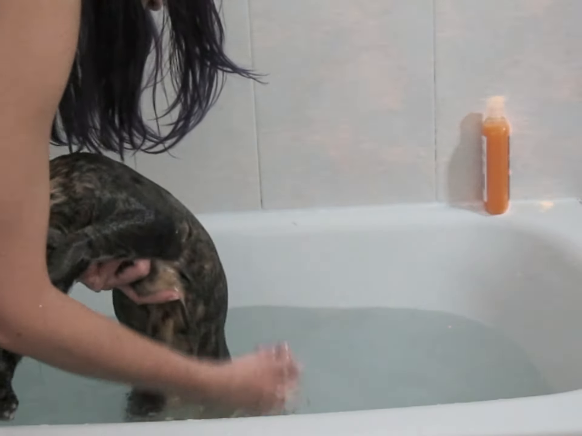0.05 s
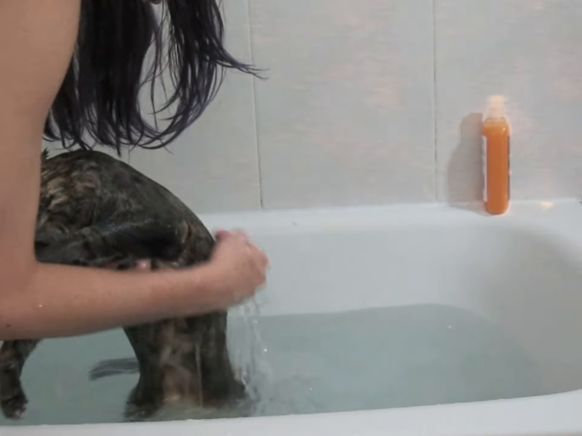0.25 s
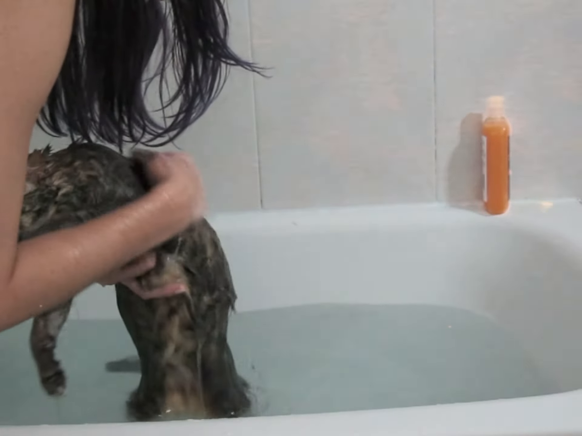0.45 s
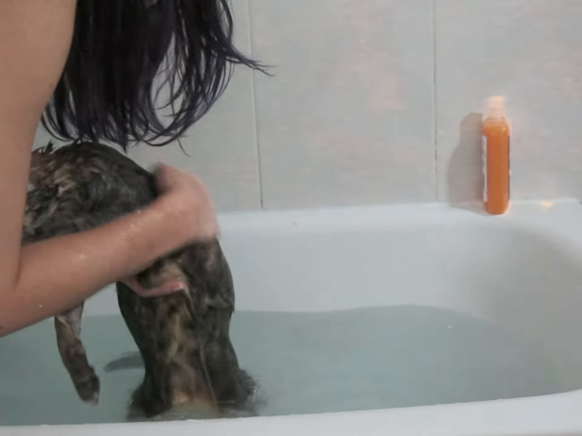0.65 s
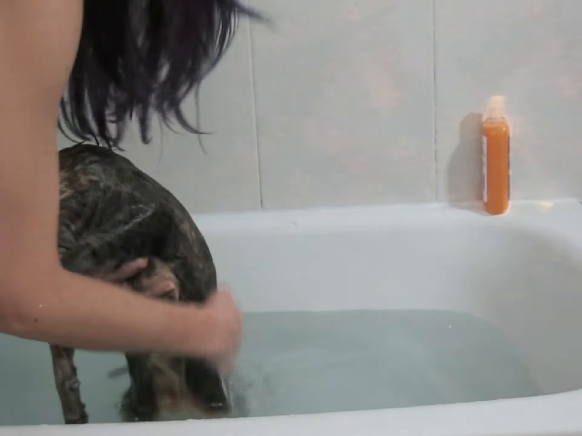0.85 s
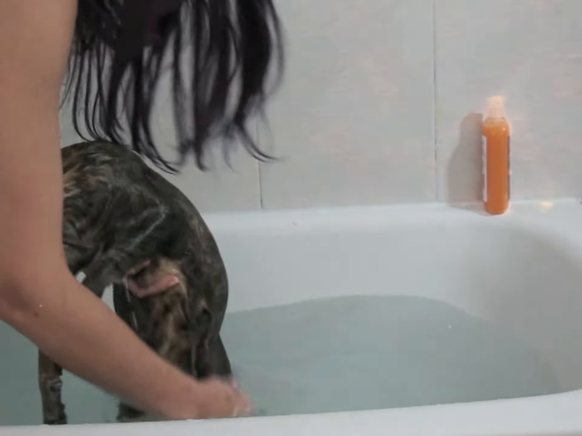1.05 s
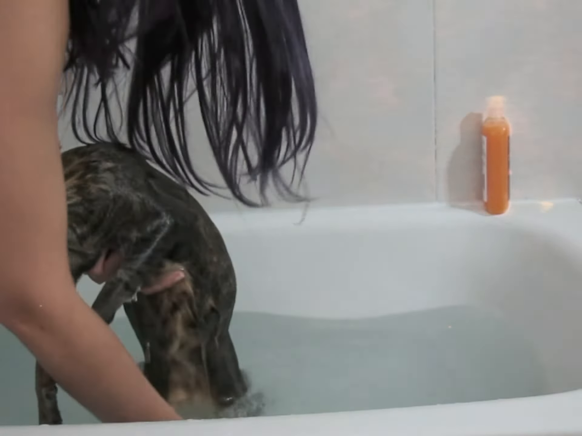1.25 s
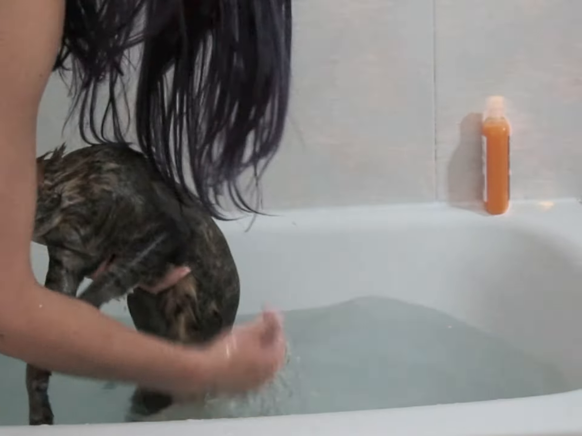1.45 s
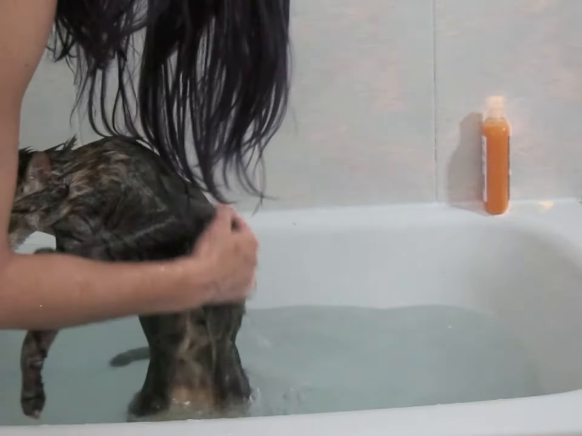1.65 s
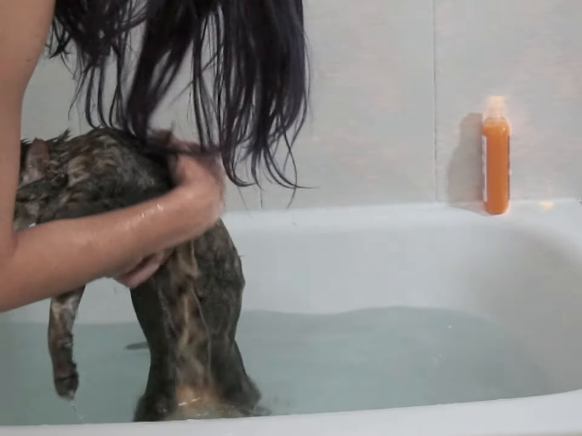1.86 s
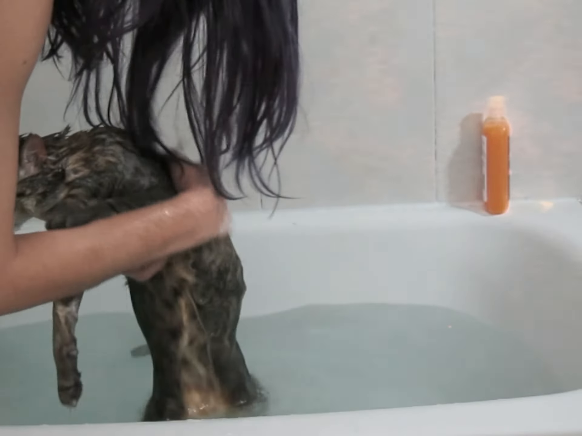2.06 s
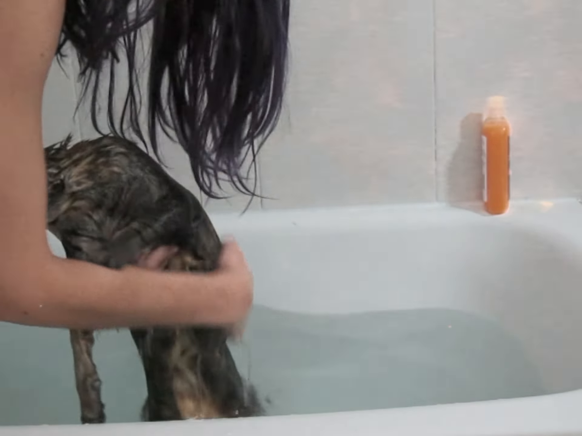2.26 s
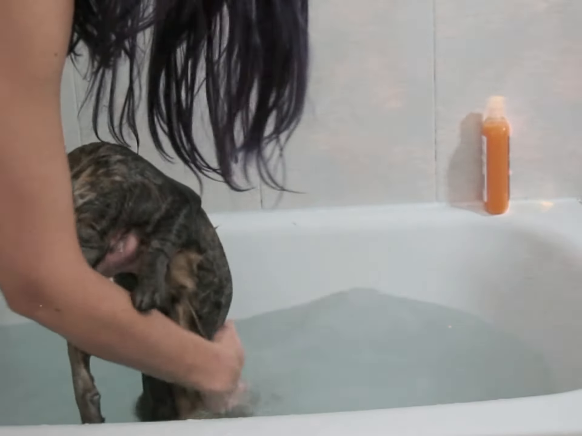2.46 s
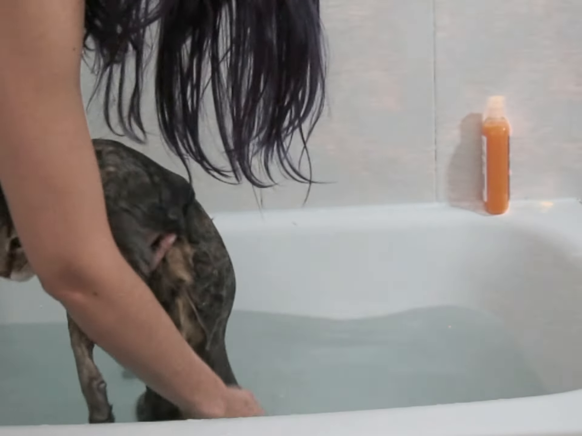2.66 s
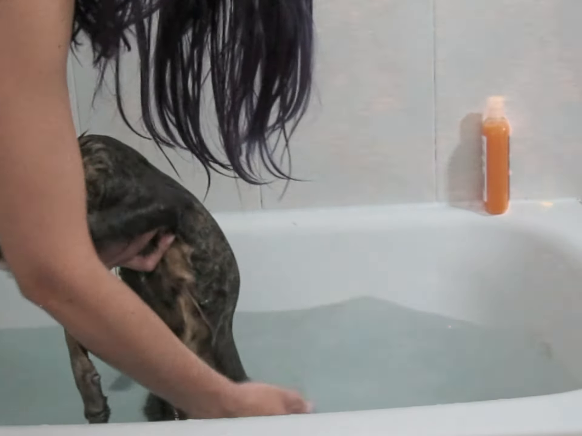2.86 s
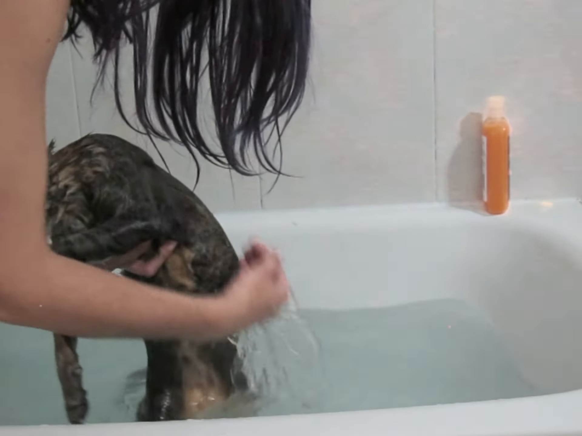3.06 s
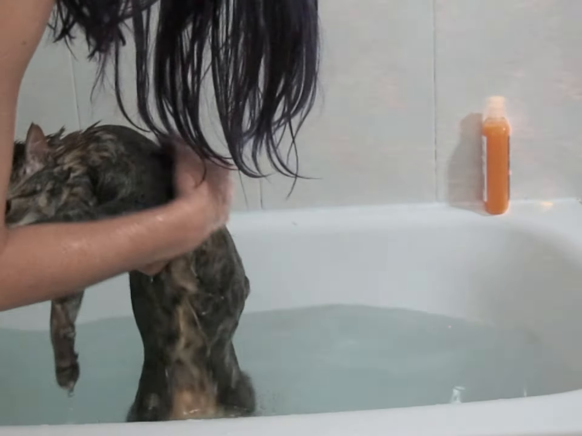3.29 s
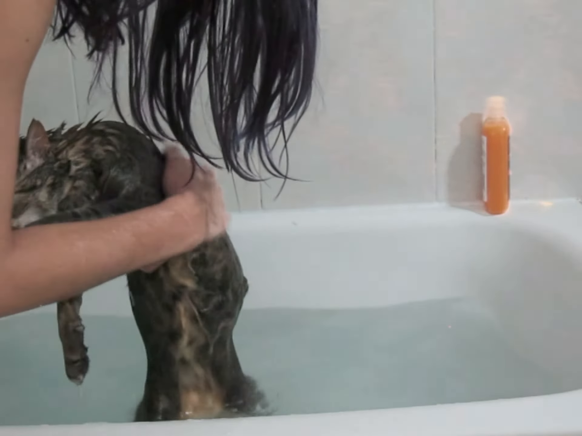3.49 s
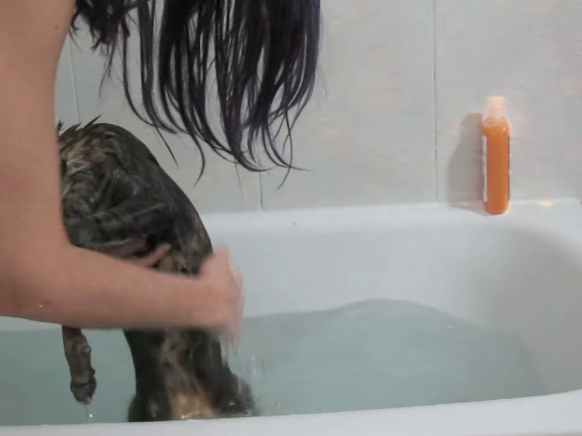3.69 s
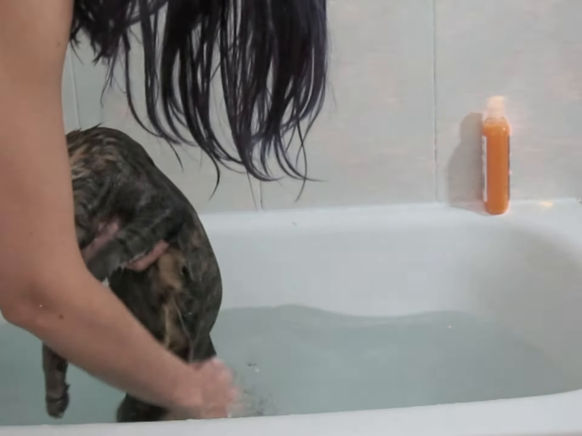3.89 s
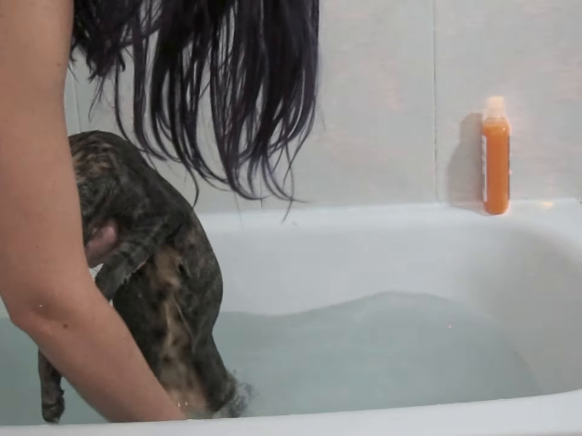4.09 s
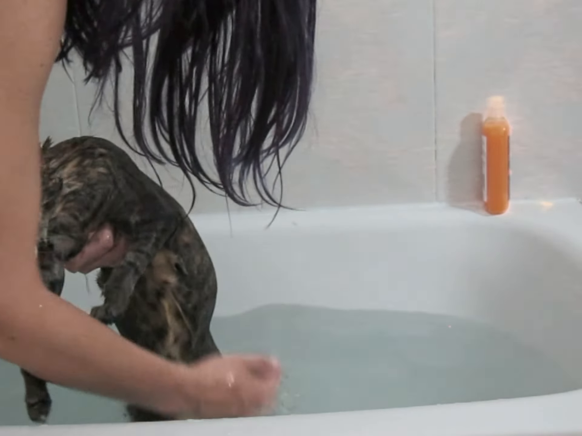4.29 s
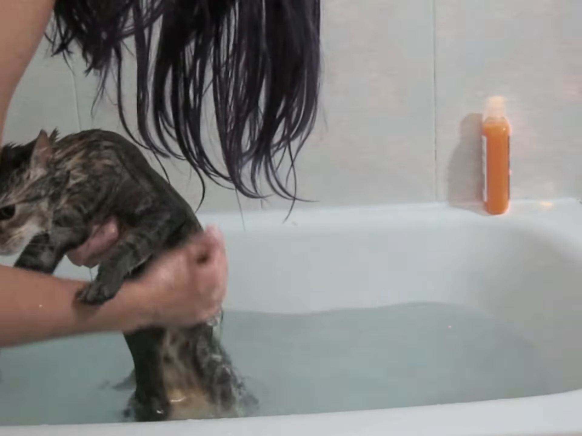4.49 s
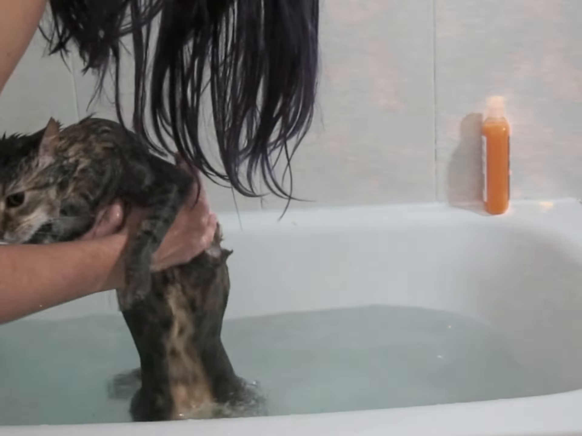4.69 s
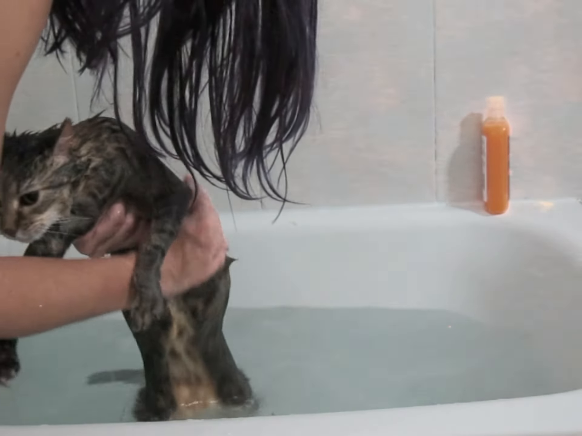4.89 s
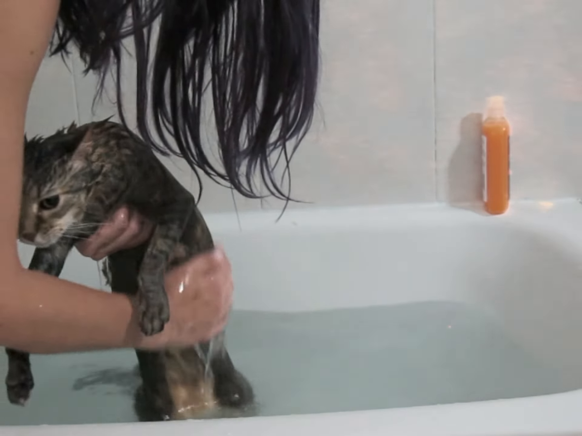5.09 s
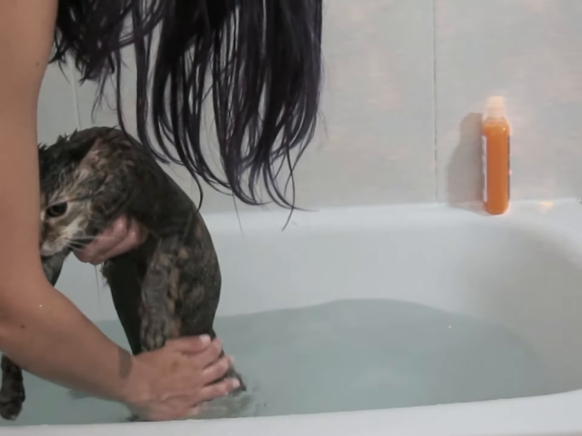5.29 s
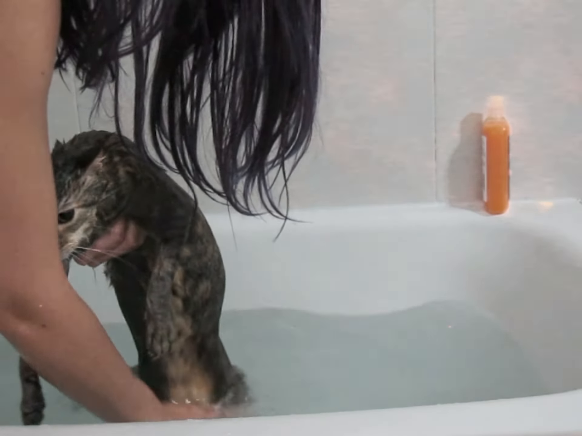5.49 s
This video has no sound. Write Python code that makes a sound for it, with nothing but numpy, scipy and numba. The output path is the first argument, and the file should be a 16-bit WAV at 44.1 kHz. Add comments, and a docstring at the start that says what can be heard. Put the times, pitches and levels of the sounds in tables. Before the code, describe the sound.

Close water sounds in a small, reflective bathroom: splashing and bubbling right away, a brief lull, then a run of hand scoops, each a plop and gurgle followed by water slapping and trickling back into the tub. The strongest slaps come near the first and second seconds; later splashes are softer, with drips between. The sound is centred and bright, with light steady hiss and a faint rumble; the cat makes no sound.

```python
"""Small tiled bathroom: a hand scoops bath water and pours it over a wet cat standing in the tub.
Trapped air rings as short rising bubbles, large and low in the slosh, tiny and dense in the spray;
water slapping water adds bright noise cracks, and the hard walls draw each sound out.
A single microphone adds its hiss and colour, over a low rumble; both channels are the same."""
import sys
import numpy as np
from scipy import signal
from scipy.fft import rfft, irfft, next_fast_len
from scipy.io import wavfile
from numba import njit

SR = 44100
rng = np.random.default_rng(int(sys.argv[2]) if len(sys.argv) > 2 else 0)


def log_audio(samples):
    """Write samples as a 16-bit WAV file to the path given in sys.argv[1]."""
    # one column per channel
    frames = np.atleast_2d(samples).T
    # limit to full scale, then quantise
    limited = np.clip(frames, -1, 1)
    pcm = np.round(limited * 32767).astype(np.int16)
    wavfile.write(sys.argv[1], SR, pcm)


N = 244314


def from_db(db):
    """Amplitude of a level in dB."""
    return 10 ** (np.asarray(db) / 20)


def rms_one(x):
    """Scale to unit RMS."""
    return x / np.sqrt(np.mean(x ** 2) + 1e-20)


def at_hz(points, hz):
    """Read a (frequency, value) curve, linear over log frequency."""
    corner_hz, value = np.array(points).T
    return np.interp(np.log(hz + 1), np.log(corner_hz), value)


def background():
    """Steady hiss of the input stage (half-octave noise bands) and building rumble (resonant noise)."""
    # hiss spectrum: (frequency [Hz], relative density [dB per Hz])
    hiss_curve = [(59, -33), (100, -8.5), (481, -11), (1030, -11), (2220, -21), (3290, -15), (6250, -28),
                  (7690, -13.5), (11600, -25.5), (12900, -23), (14000, -53)]
    # rumble resonances: (frequency [Hz], pole width [Hz], RMS level [dB])
    rumble_modes = [(21.7, 13.3, -53), (62.4, 22.2, -59.5), (153.9, 17, -74)]
    hiss_db = -59.5

    white = rng.standard_normal((2, N))
    edges_hz = 90 * 2 ** np.arange(0, 7.6, .5)
    hiss = 0
    for k, (low_hz, high_hz) in enumerate(zip(edges_hz, edges_hz[1:])):
        sos = signal.butter(2, [low_hz, high_hz], "band", fs=SR, output="sos")
        band = signal.sosfilt(sos, white[k % 2])  # neighbours use independent noise
        hiss = hiss + from_db(at_hz(hiss_curve, np.sqrt(low_hz * high_hz))) * band
    out = from_db(hiss_db) * rms_one(hiss)

    for hz, width_hz, level_db in rumble_modes:
        r = np.exp(-np.pi * width_hz / SR)
        sos = [[0.98, 0.0025, -1, 1, -2 * r * np.cos(2 * np.pi * hz / SR), r * r]] * 2
        settled = signal.sosfilt(sos, rng.standard_normal(N + SR))[SR:]
        out += from_db(level_db) * rms_one(settled)
    return out


def bathroom(spots):
    """Direct sound, one strong tile echo, standing waves, and looping paths that differ by spot."""
    # reverberation of the tiled room: (frequency [Hz], T60 [s])
    tiles_t60 = [(100, 1), (500, 0.19), (1500, 0.32), (4000, 0.25), (8000, 0.19), (14000, 0.27)]
    # gain of the scattered sound: (frequency [Hz], gain [dB])
    scatter_gain = [(300, 5), (1000, 8), (3000, 4.5), (8000, 9.5), (14000, 9)]
    # standing waves over the tub: (frequency [Hz], T60 [s], relative level [dB])
    air_modes = [(440.7, 0.63, 2), (520, 1, -8), (579, 0.78, -4), (589, 0.49, -9), (625, 0.55, -3.5),
                 (691, 0.53, -5.5), (910, .5, -3.5), (970, 0.17, -6), (1058, 0.31, -1.5),
                 (1183, 0.38, -1.5), (1344, 0.37, -0.5)]
    first_echo_s, echo_db, modes_db = 0.01, -5, 14

    size = next_fast_len(N + SR // 2)
    hz = np.arange(size // 2 + 1) * SR / size
    travel = np.log(1000) / at_hz(tiles_t60, hz) + 2j * np.pi * hz  # loss and phase per second of path

    scatter = from_db(at_hz(scatter_gain, hz))
    for lag_s in (.001317, .002903, .004731):  # near-allpass diffusers
        step = np.exp(-2j * np.pi * hz * lag_s)
        scatter = scatter * (step - .6) / (1 - 0.61 * step)

    standing = 0
    for mode_hz, mode_t60_s, gain_db in air_modes:
        detuning = 2j * np.pi * (hz - mode_hz) * mode_t60_s / np.log(1000)
        standing = standing + from_db(gain_db) / (1 + detuning)
    echo_delay = np.exp(-2j * np.pi * hz * first_echo_s)
    early = 1 + echo_delay * (from_db(echo_db) + from_db(modes_db) * standing)

    out = 0
    for x, shortest_s in zip(spots, (.0127, .01343, .01411)):
        lags_s = shortest_s * 1.1317 ** np.arange(13)
        loops = 0
        for k, lag_s in enumerate(lags_s):
            weight = (-1) ** k * np.sqrt(lag_s / lags_s.sum())
            loops = loops + weight / (np.exp(lag_s * travel) - 1)  # endless decaying repeats
        out = out + rfft(x, size) * (early + scatter * loops)
    return irfft(out, size)[:N]


def microphone(x):
    """Presence peaks of the small capsule and its housing, and a falling top."""
    # broad response: (frequency [Hz], gain [dB])
    slope = [(20, -5), (9800, 0.5), (10600, 0), (13000, -3), (14300, -9)]
    # presence peaks: (frequency [Hz], width [Hz], gain [dB])
    peaks = [(3290, 860, 8), (5200, 620, 4), (7510, 920, 9), (9110, 850, 8)]

    size = next_fast_len(N + 4096)
    hz = np.arange(size // 2 + 1) * SR / size
    out = irfft(rfft(x, size) * from_db(at_hz(slope, hz)), size)[:N]
    for peak_hz, width_hz, gain_db in peaks:
        r = np.exp(-np.pi * width_hz / SR)
        b = [(1 - r * r) / 2, 0, (r * r - 1) / 2]
        a = [1, -2 * r * np.cos(2 * np.pi * peak_hz / SR), r * r]
        out = out + (from_db(gain_db) - 1) * signal.lfilter(b, a, out)
    return out


def slaps():
    """A sheet of water bursts on the surface: band-passed decaying noise, a crack of milliseconds."""
    # slaps of water on water: (time [s], level [dB], decay time [s], low edge [Hz], high edge [Hz])
    slap_events = [(0.801, -38, .004, 3000, 12800), (0.814, -24, 0.004, 2440, 12800),
                   (1.497, -35.5, 0.0082, 2980, 10000), (2.263, -27, 0.0062, 2620, 8900),
                   (2.27, -24.5, 0.005, 2600, 8100), (2.303, -29, 0.0036, 2500, 8800),
                   (2.102, -43.5, 0.0031, 8800, 13500), (2.478, -32.5, 0.0036, 9000, 14100),
                   (3.074, -35.5, 0.0062, 9600, 14000), (3.157, -35.5, 0.009, 3470, 11400),
                   (3.198, -31.5, 0.0066, 10100, 14150), (3.696, -40.5, 0.0069, 4940, 11100),
                   (3.733, -28.5, 0.01, 2720, 7800), (3.794, -28, 0.0057, 9000, 14000),
                   (4.399, -39.5, 0.021, 3420, 11300), (4.993, -35.5, 0.0056, 6100, 11000),
                   (5.361, -26, 0.0014, 6100, 10900)]

    out, t = np.zeros(N), np.arange(2000) / SR
    for start_s, level_db, decay_s, low_hz, high_hz in slap_events:
        burst = rng.standard_normal(len(t)) * np.exp(-t / max(decay_s, .0005))
        sos = signal.butter(2, [low_hz, high_hz], "band", fs=SR, output="sos")
        out[int(start_s * SR):][:len(t)] += from_db(level_db) * signal.sosfilt(sos, burst)
    return out


@njit
def ring_bubbles(out, start, height, hz, rise_octaves, cycles, sr):
    """Each bubble is a dying sine; its pitch climbs as it nears the surface."""
    for k in range(len(start)):
        length, phase = int(cycles[k] / hz[k] * sr), 0.
        for i in range(min(length, len(out) - start[k])):
            gone = i / length
            phase += 2 * np.pi * hz[k] * 2 ** (rise_octaves[k] * gone) / sr
            shape = 2 * min(1., 7 * gone) * (1 - gone) * np.exp(-gone)
            out[start[k] + i] += height[k] * shape * np.sin(phase)


def single_bubbles():
    """Clear plops and drips; each air pocket breaks up and leaves two weaker bubbles close by."""
    # single bubbles: (time [s], level [dB], starting pitch [Hz], rise [octaves],
    #                  length [cycles of the starting pitch])
    bubble_events = [(0.038, -37, 1820, .3, 8.6), (.061, -38.5, 3841, .15, 19), (.065, -44, 900, 0.37, 11),
                     (.114, -29, 900, 0.45, 12.7), (0.121, -36.5, 1244, 0.6, 25),
                     (.135, -36, 2510, 0.14, 19), (0.181, -39.5, 5330, .19, 23),
                     (.185, -33.5, 1550, .12, 13), (.201, -39, 9350, 0.3, 17), (.23, -35, 2920, 0.054, 20),
                     (.293, -39.5, 3940, 0.9, 30), (.326, -38.5, 3370, 0.19, 13),
                     (.343, -50, 634, .28, 9.1), (.33, -33, 6200, .18, 11), (.393, -39.5, 1960, 0.15, 18),
                     (0.484, -39.5, 7360, 0.31, 9.2), (.505, -45, 417, 0.086, 7.4),
                     (.513, -46, 2490, 0.13, 18), (.607, -49, 4920, 0.13, 21), (.645, -42, 1068, 0.037, 22),
                     (0.662, -49.5, 1147, 2.1, 29), (0.661, -52, 2580, 0.12, 20),
                     (0.695, -47.5, 5420, 0.19, 33), (.798, -39.5, 1340, 0.074, 21),
                     (.808, -31.5, 5880, 0.63, 22), (.835, -52.5, 414, .08, 5.3),
                     (.92, -36.5, 940, 0.62, 4.5), (.972, -36.5, 1030, 0.096, 13),
                     (.982, -26.5, 1160, .08, 3.8), (1.013, -42.5, 436, .092, 5.6),
                     (1.019, -37, 1380, 0.22, 8.4), (1.049, -42, 690, 0.058, 15),
                     (1.051, -41.5, 419, 0.078, 12), (1.072, -44.5, 2510, 0.54, 19),
                     (1.256, -54, 1570, 0.095, 52), (1.317, -40, 884, .08, 10.3),
                     (1.34, -40.5, 851, 0.32, 11.7), (1.341, -51.5, 2900, .31, 17),
                     (1.402, -44, 6060, 3.7, 9.7), (1.422, -48, 1600, 0.087, 34),
                     (1.457, -37.5, 1018, .08, 28), (1.477, -34, 595, 0.063, 23.6),
                     (1.518, -35, 1084, .08, 11), (1.53, -50, 559, .068, 31), (1.561, -37, 8900, 0.15, 19),
                     (1.613, -36, 1530, .055, 9.9), (1.74, -39, 1880, .08, 9.3),
                     (1.749, -47, 5500, .15, 18), (1.845, -38.5, 7730, 0.17, 12),
                     (1.854, -51, 5500, .12, 18), (1.88, -56, 3240, .17, 18),
                     (1.885, -43.5, 1766, 0.081, 24), (2.04, -48, 1690, 0.044, 12),
                     (2.052, -54, 2960, 0.18, 16), (2.099, -51, 9500, .26, 16),
                     (2.173, -51.5, 3370, 0.16, 16), (2.236, -46, 1090, 0.068, 24),
                     (2.26, -31.5, 7060, 0.16, 20), (2.29, -51.5, 421, 0.78, 22),
                     (2.357, -33.5, 1042, 0.091, 47), (2.381, -34, 1324, 0.11, 16),
                     (2.445, -43.5, 433, 0.069, 9.2), (2.471, -42.5, 9200, 0.14, 15),
                     (2.48, -40, 3190, 0.26, 17), (2.541, -42, 417, .059, 14), (2.565, -41, 403, .06, 10),
                     (2.63, -45.5, 6500, 0.82, 16), (2.679, -46.5, 1610, 0.18, 9.9),
                     (2.759, -49, 4280, 0.4, 59), (2.836, -49.5, 3380, .29, 22),
                     (2.873, -46.5, 1180, 0.97, 20), (2.887, -43, 5570, 0.23, 32),
                     (2.91, -35, 6900, .11, 15), (2.953, -35.5, 1240, .17, 8.5),
                     (2.968, -34.5, 6300, 0.15, 14), (2.972, -42, 2790, .15, 18),
                     (3.016, -44, 980, 0.043, 33), (3.062, -47.5, 2010, 0.064, 49),
                     (3.139, -37.5, 1390, 0.2, 9.8), (3.157, -39.5, 770, 0.14, 18.3),
                     (3.176, -32, 2590, 0.52, 26.5), (3.191, -48, 3120, .03, 40),
                     (3.198, -41, 736, .096, 22), (3.236, -34.5, 3020, .093, 25),
                     (3.237, -39.5, 1600, .08, 22), (3.529, -52, 7000, 1.3, 14), (3.709, -48, 1410, .1, 23),
                     (3.731, -35, 1373, 0.08, 11), (3.732, -32.5, 3070, 0.74, 22),
                     (3.739, -31, 4740, 0.45, 19), (3.832, -39, 970, 1.31, 22.8),
                     (3.92, -41.5, 580, .093, 7.7), (3.955, -46.5, 497, 0.072, 13.7),
                     (3.982, -46.5, 797, 0.078, 19), (4.027, -47.5, 5360, .18, 40),
                     (4.03, -55, 820, .08, 21), (4.086, -44, 7100, .13, 19), (4.137, -52.5, 2640, .15, 17),
                     (4.208, -41, 840, 0.24, 17), (4.209, -41.5, 2310, 0.23, 26.4),
                     (4.226, -45, 8750, .15, 16), (4.229, -40.5, 874, 0.99, 23.4),
                     (4.318, -45, 1040, 0.5, 14), (4.365, -43.5, 2780, 0.65, 8.3),
                     (4.392, -44.5, 1370, .08, 20), (4.423, -42.5, 2030, .38, 15),
                     (4.474, -45, 1100, .08, 6.8), (4.5, -43, 1460, .1, 14), (4.512, -42, 8500, 0.46, 13),
                     (4.537, -43.5, 3660, 0.65, 16), (4.671, -68, 520, 0.023, 100),
                     (4.721, -47.5, 953, 2.1, 48), (4.722, -47, 1044, 0.087, 19),
                     (4.762, -53.5, 2710, 0.16, 28), (4.842, -55, 1104, 0.071, 36),
                     (4.901, -45, 1360, 0.062, 28), (4.915, -66, 593, 0.031, 54),
                     (4.99, -40, 7030, .22, 26), (5.019, -48.5, 2890, 0.19, 48),
                     (5.028, -36, 1310, .062, 16.5), (5.063, -42, 9845, .15, 13),
                     (5.118, -44.5, 9300, .16, 32), (5.127, -35.5, 549, 0.06, 12.4),
                     (5.13, -41.5, 820, .25, 17.6), (5.183, -39, 900, 0.072, 16),
                     (5.214, -36, 7160, 0.14, 14), (5.272, -32, 1280, 1.12, 13.8),
                     (5.31, -36.5, 1260, 0.064, 11), (5.359, -49.5, 2010, 1.07, 54),
                     (5.363, -42.5, 610, 0.23, 7.3), (5.383, -49, 413, 0.049, 13),
                     (5.486, -57, 1640, 0.053, 21)]
    sibling_db, sibling_within_s, sibling_octaves = -3, .025, .17

    start_s, level_db, hz, rise_octaves, cycles = np.transpose(bubble_events)
    cycles = np.clip(cycles, 2, 90)
    out = np.zeros((3, N))
    ring_bubbles(out[0], (start_s * SR).astype(int), from_db(level_db), hz, rise_octaves, cycles, SR)
    for spot in out[1:]:
        later, detune = rng.random((len(start_s), 2)).T
        start = ((start_s + sibling_within_s * later) * SR).astype(int)
        height = from_db(level_db + sibling_db)
        sibling_hz = hz * 2 ** (sibling_octaves * (detune - .4))
        ring_bubbles(spot, start, height, sibling_hz, rise_octaves, 0.87 * cycles, SR)
    return out


def swarm(s, level_db, base_hz, octaves, per_s, cycles, spread_db, gain_db):
    """Chance bubbles of uneven size at three spots, scaled by the level curve at their birth."""
    when, pitch, size, climb, kept, spot = rng.random((14000, 6)).T
    when_s = when * N / SR
    born = kept < per_s * N / SR / len(kept)
    hz = np.interp(when_s, s, base_hz * np.ones(len(s))) * 2 ** (octaves * (pitch - .33))
    height = from_db(-spread_db * np.log(size + 0.038)) * born
    # level the swarm's overall power before the curve is applied
    height = height / np.sqrt(np.sum(height ** 2 * cycles / hz) / 3 * SR / N)
    height = height * from_db(np.interp(when_s, s, level_db) + gain_db)
    start = (when_s * SR).astype(int)
    out = np.zeros((3, N))
    for k in range(3):
        here = born * ((3 * spot).astype(int) == k)
        ring_bubbles(out[k], start, height, hz, 0.65 * climb, cycles * here, SR)
    return out


def surges(s, events, release_db_per_s):
    """Each surge in dB under its top, and time since the top: climb, sagging hold, release."""
    attack_depth_db, hold_sag_db_per_s = 21.5, 22.5
    start_s, attack_s, hold_s = np.transpose(events)[:3, :, None]
    attack_s = np.maximum(attack_s, .002)
    since_s = s - start_s - attack_s
    climb_db = attack_depth_db * np.minimum(since_s, 0) / attack_s
    after_s = np.maximum(since_s, 0)
    held_s = np.clip(since_s, 0, np.maximum(hold_s, 0))
    fall_db = hold_sag_db_per_s * held_s + release_db_per_s * (after_s - held_s)
    return climb_db - fall_db, after_s


def together(shape_db, top_db, calm_db, pitch_hz=0, calm_hz=0):
    """Overlapping surges and calm dripping add in power; pitch is their power-weighted mean."""
    power = from_db(np.maximum(shape_db + top_db[:, None], -200)) ** 2
    calm = from_db(calm_db) ** 2
    total = power.sum(axis=0) + calm
    mean_hz = (np.sum(power * pitch_hz, axis=0) + calm * calm_hz) / total
    return 10 * np.log10(total), mean_hz


def gurgle_and_slosh(s):
    """Large bubbles gurgle where the hand ploughs; lower ones slosh, stronger under deeper gulps."""
    # gulps of air pulled under: (start [s], attack [s], hold [s], level [dB], pitch [Hz])
    gulps = [(0, 0.041, 0.011, -23, 1382), (0.083, 0.067, 0.18, -36.5, 1026),
             (0.363, 0.061, 0.021, -43, 845), (0.454, 0.058, 0.012, -44, 482),
             (0.783, 0.023, 0.18, -29.5, 1332), (0.947, 0.067, 0.061, -30, 1010),
             (1.253, 0.037, 0.059, -41.5, 930), (1.346, 0.073, 0.037, -32, 1080),
             (1.457, 0.059, 0.036, -30, 750), (1.827, 0.035, 0.0068, -43.5, 1470),
             (2.223, 0.035, .01, -38.5, 1070), (2.356, .04, 0.013, -31, 1030),
             (2.459, .03, 0.04, -34.5, 958), (2.516, 0.044, .05, -33.5, 520),
             (2.8, 0.047, 0.0091, -40.5, 1185), (3.1, 0.078, 0.049, -38, 1042),
             (3.69, 0.043, .01, -36, 1445), (3.806, .03, 0.006, -25.5, 1123),
             (3.861, .06, 0.029, -39.5, 620), (4.004, .05, .12, -55, 840), (4.183, 0.032, 0.32, -42, 1088),
             (4.705, 0.035, 0.0091, -37.5, 1193), (4.798, 0.069, 0.078, -55, 1360),
             (4.994, 0.022, 0.058, -41, 1280), (5.109, 0.025, .05, -31.5, 680),
             (5.239, 0.051, 0.0082, -32.5, 1280), (5.334, 0.023, 0.0078, -32, 1070),
             (5.455, 0.053, .01, -50, 890)]
    # gurgle bubbles: (pitch spread [octaves], rate [1/s], length [cycles],
    #                  size spread [dB per e-fold], gain [dB])
    gurgle_swarm = (1.87, 150, 14, 2.5, -12)
    # slosh bubbles: (base pitch [Hz], then the same columns)
    slosh_swarm = (333.5, 1.46, 59, 6.5, 2, -27.5)
    release_db_per_s, calm_db, calm_hz = 150.5, -65, 900
    sag_octaves_per_s = 0.89  # pockets grow as the hand sinks
    slosh_db_per_octave, slosh_at_hz = -5.5, 804  # deeper gulps move more water

    *_, top_db, top_hz = np.transpose(gulps)
    shape_db, since_s = surges(s, gulps, release_db_per_s)
    pitch_hz = top_hz[:, None] * 2 ** (-sag_octaves_per_s * since_s)
    gurgle_db, gurgle_hz = together(shape_db, top_db, calm_db, pitch_hz, calm_hz)
    slosh_db = gurgle_db + slosh_db_per_octave * np.log2(gurgle_hz / slosh_at_hz)
    return swarm(s, gurgle_db, gurgle_hz, *gurgle_swarm) + swarm(s, slosh_db, *slosh_swarm)


def patter_and_spray(s):
    """Drops patter back as bubbles; fine spray fizzes as a dense swarm of tiny ones."""
    # splashes of the plunging, lifting and pouring hand: (start [s], attack [s], hold [s],
    #     patter level [dB], patter pitch [Hz], spray level [dB])
    splashes = [(0, 0.002, .01, -34, 2670, -31.5), (0.02, 0.11, 0.26, -31, 2784, -33),
                (0.528, 0.039, 0.015, -48, 3300, -44), (0.769, 0.038, 0.17, -33, 3085, -31.5),
                (1, 0.065, 0.035, -36, 2680, -34.5), (1.294, .1, 0.046, -43, 3510, -42.5),
                (1.44, .07, 0.039, -33, 2760, -31.5), (1.523, 0.055, 0.041, -33.5, 2790, -31),
                (1.829, 0.029, 0.005, -63, 2800, -37.5), (1.9, 0.11, 0.33, -49.5, 2800, -52),
                (2.217, 0.053, 0.0071, -27.5, 3860, -31), (2.327, 0.045, 0.0059, -36.5, 3510, -30.5),
                (2.477, 0.039, 0.24, -43, 2330, -46.5), (2.58, 0.11, 0.026, -52, 2620, -42.5),
                (2.861, 0.034, 0.12, -45, 2780, -36.5), (2.94, 0.11, 0.0073, -38, 2750, -46),
                (3.054, .07, 0.014, -48, 3020, -33), (3.134, 0.033, 0.035, -30, 3210, -43),
                (3.214, 0.051, .01, -45, 3600, -38), (3.667, 0.054, 0.12, -36.5, 3530, -32.5),
                (3.816, 0.044, 0.046, -36, 2790, -35), (3.96, 0.041, .22, -49.5, 2900, -46.5),
                (4.2, 0.035, 0.26, -39.5, 2810, -40.5), (4.345, 0.037, 0.16, -39.5, 2900, -38.5),
                (4.686, 0.042, 0.087, -52.5, 2840, -56), (4.983, .03, 0.093, -58, 3500, -39),
                (5.005, .03, 0.011, -44, 3220, -55), (5.092, 0.039, 0.053, -38.5, 2900, -38),
                (5.174, 0.024, 0.0074, -36.5, 2700, -32), (5.306, 0.054, 0.012, -49.5, 2510, -36),
                (5.42, 0.037, 0.0083, -48, 2800, -49)]
    # patter bubbles: (pitch spread [octaves], rate [1/s], length [cycles],
    #                  size spread [dB per e-fold], gain [dB])
    patter_swarm = (2.5, 454.5, 15.5, 2.5, -13)
    # spray bubbles: (base pitch [Hz], then the same columns)
    spray_swarm = (7813, 2.5, 1793, 8.5, 2.5, -13.5)
    release_db_per_s = 144
    calm_patter_db, calm_patter_hz, calm_spray_db = -72, 2900, -58  # dripping between splashes

    *_, patter_top_db, patter_top_hz, spray_top_db = np.transpose(splashes)
    shape_db, _ = surges(s, splashes, release_db_per_s)
    patter_db, patter_hz = together(shape_db, patter_top_db, calm_patter_db,
                                    patter_top_hz[:, None], calm_patter_hz)
    spray_db, _ = together(shape_db, spray_top_db, calm_spray_db)
    return swarm(s, patter_db, patter_hz, *patter_swarm) + swarm(s, spray_db, *spray_swarm)


def churned_water():
    """All bubble swarms stirred up by the hand, on a 4 ms control grid."""
    s = np.arange(0, N / SR, .004)
    return gurgle_and_slosh(s) + patter_and_spray(s)


def scene():
    """The water in its room, heard by one capsule on both channels."""
    spots = churned_water() + single_bubbles()
    spots[1] += slaps()
    return np.tile(microphone(bathroom(spots)) + background(), (2, 1))


def record(dry):
    """A steep low-pass cuts the top."""
    cutoff_hz = 14700
    return signal.sosfilt(signal.cheby2(12, 70, cutoff_hz, fs=SR, output="sos"), dry)


dry = scene()
out = record(dry)
log_audio(out)
```